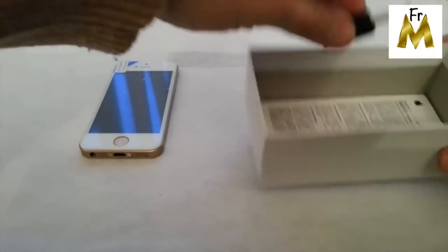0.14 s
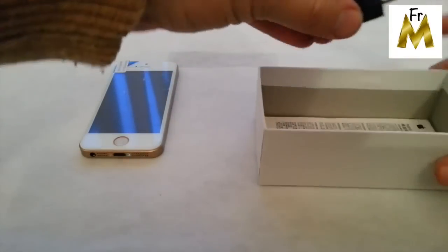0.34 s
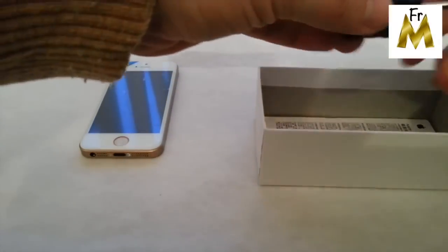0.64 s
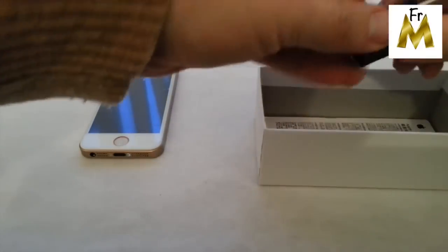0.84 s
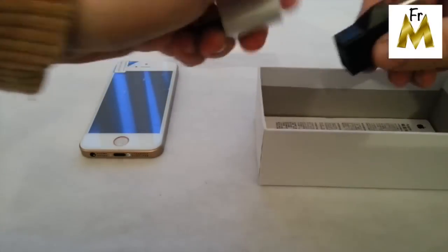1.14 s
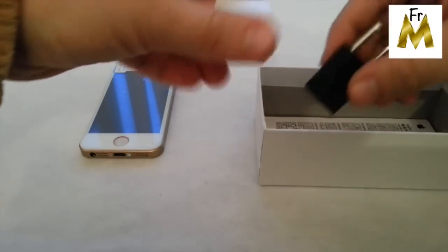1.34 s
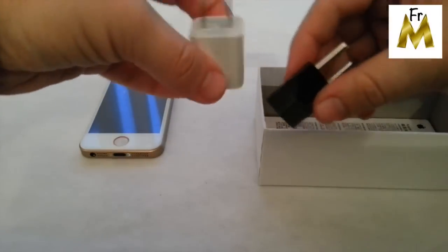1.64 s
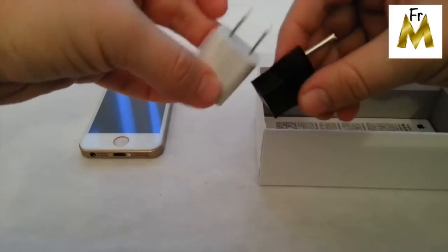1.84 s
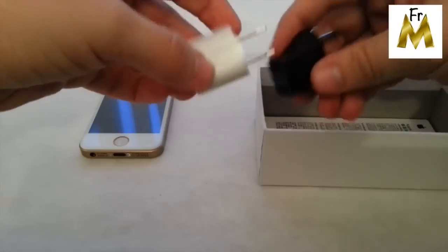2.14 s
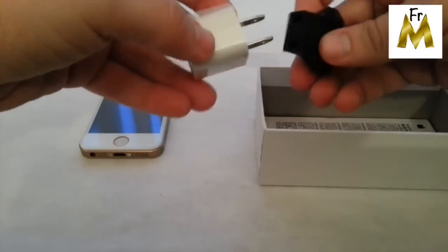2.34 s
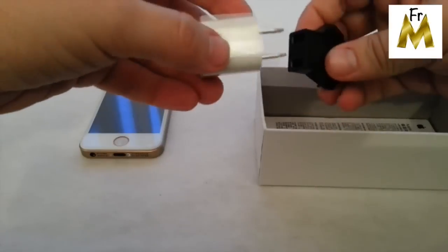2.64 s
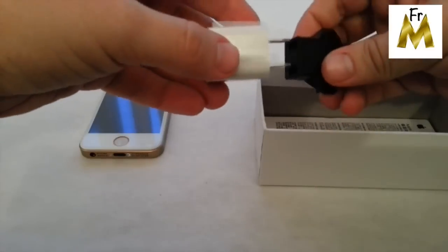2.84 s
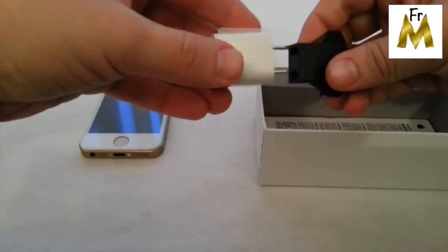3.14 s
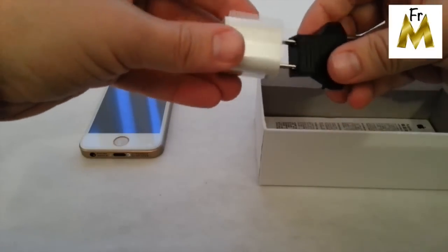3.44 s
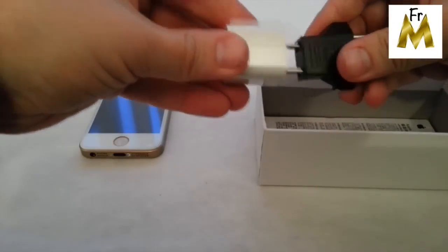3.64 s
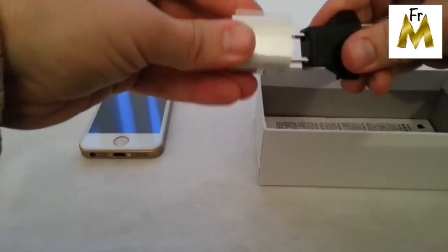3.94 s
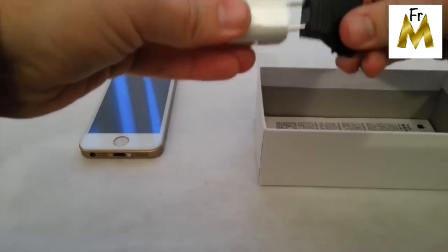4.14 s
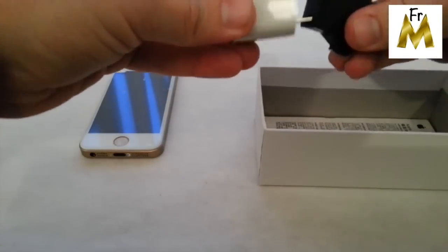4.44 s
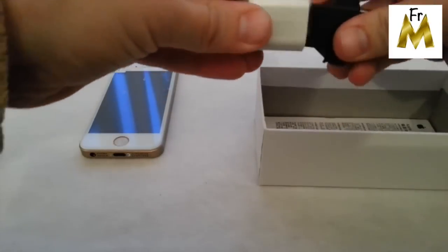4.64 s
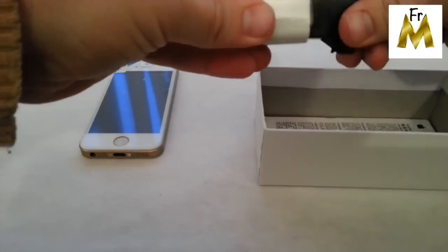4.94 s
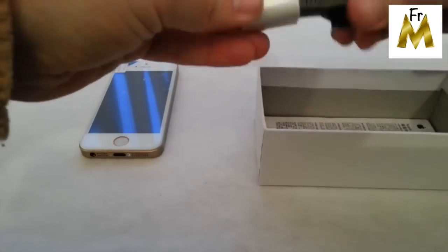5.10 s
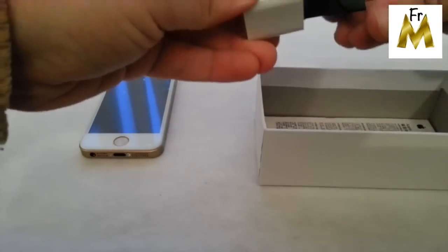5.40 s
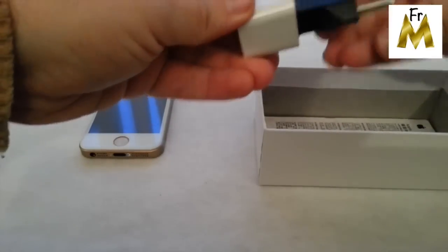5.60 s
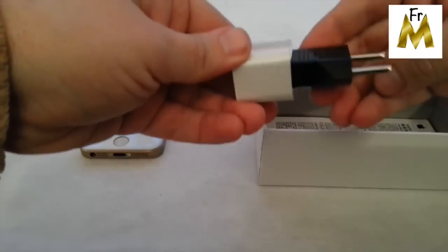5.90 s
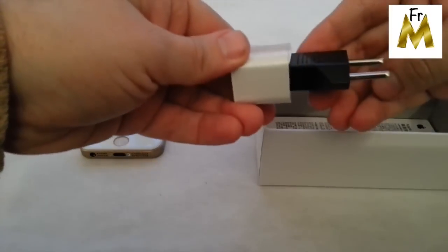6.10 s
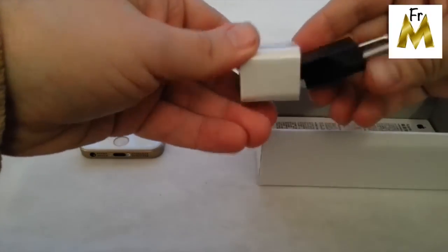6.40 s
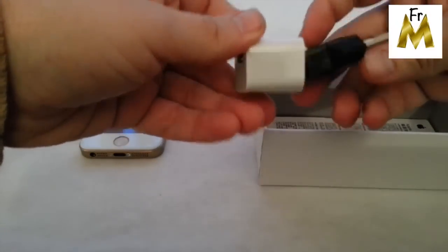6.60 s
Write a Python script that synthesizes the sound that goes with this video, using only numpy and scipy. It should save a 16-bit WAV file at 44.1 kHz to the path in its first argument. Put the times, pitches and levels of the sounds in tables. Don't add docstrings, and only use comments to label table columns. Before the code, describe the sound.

Quiet indoor tabletop handling in close stereo. A soft cardboard thud comes early, followed by one bright metallic click, scattered plastic ticks and hollow knocks as two small parts are fitted together with a firm push. Then it is almost silent until a final little cluster of clicks. Behind it, a muffled vehicle drones past, and noise suppression makes the background pump.

```python
import sys
import numpy as np
from scipy import signal
from scipy.fft import rfft, irfft
from scipy.io import wavfile

SR = 44100
rng = np.random.default_rng(int(sys.argv[2]) if len(sys.argv) > 2 else 0)


def wrap_up_sound(samples):
    columns = np.atleast_2d(samples).T
    tamed = np.clip(columns, -1, 1)
    steps = np.round(tamed * 32767).astype(np.int16)
    wavfile.write(sys.argv[1], SR, steps)


def volts(x):
    e = np.asarray(x, float) / 20
    return 10 ** e


N = 298116


def rms_one(x):
    return x / np.sqrt(np.mean(x ** 2) + 1e-20)


def peak_one(x):
    return x / np.abs(x).max(-1, keepdims=True)


def add(out, sound, start_s):
    i = round(start_s * SR)
    out[..., i:i + sound.shape[-1]] += sound[..., :N - i]


def in_time(rows):
    s, *columns = np.transpose(rows)
    return [np.interp(np.arange(N) / SR, s, column) for column in columns]


def at_hz(points, hz):
    point_hz, point_db = np.transpose(points)
    return np.interp(np.log(hz), np.log(point_hz), point_db)


def humps(rows, width_s):
    t = np.arange(0, N, 32) / SR
    total_db = sum(db * np.clip(1 - abs(t - s) / width_s / 2, 0, 1) for s, db in rows)
    return np.interp(np.arange(N) / SR, t, total_db)


def drift(rate_hz):
    r = np.exp(-80 * np.pi * rate_hz / SR)
    slow = signal.lfilter([1], [1, -2 * r, r * r], rng.standard_normal(N // 40 + 2002))[2000:]
    return np.interp(np.arange(N) / 40, np.arange(len(slow)), rms_one(slow))


def ring(clicks, hz, t60_s):
    r, w = volts(-60 / (t60_s * SR)), 2 * np.pi * hz / SR
    return signal.lfilter([0, np.sin(w)], [1, -2 * r * np.cos(w), r * r], clicks + 1e-18)


# start in seconds, hold in seconds, lift in dB.
OPENINGS = [(0, 0.3, 13), (0.404, 0.1, 10), (0.677, 0.02, 7), (0.853, 0.037, 9), (1.143, 0.26, 12.5),
            (1.398, 0.14, 7.5), (1.657, 0.44, 11.5), (2.17, 0.46, 12), (2.75, .12, 13.5),
            (3.022, 0.31, 13.5), (3.265, 0.74, 16.5), (4.024, 0.11, 12), (4.23, 0.2, 12.5),
            (4.551, 0.02, 12), (4.625, 0.091, 12.5), (4.88, 0.018, 11), (4.732, 0.068, 5.5), (5.12, .16, 4),
            (5.317, 0.317, -1.5), (5.7, 0.16, -5), (5.938, 0.13, 8), (6.193, 0.032, 5), (6.425, 0.04, 12.5),
            (6.5, .07, 8.5), (6.566, 0.17, 9.5), (0.922, 0.089, 3.5), (1.56, 0.07, 2.5), (2.66, .06, 4),
            (2.93, .06, 2.5), (4.15, 0.056, 6), (.55, .08, 3), (4.45, 0.056, 3), (4.983, 0.055, 3),
            (6.288, 0.092, 3.5)]


def suppressor():
    open_db_per_s, close_db_per_s, usual_lift_db = 352, 160, 12
    t = np.arange(0, N, 32) / SR
    s, hold_s, lift_db = np.transpose(OPENINGS)[..., None]
    before_s = np.clip(s - t, 0, None)
    after_s = np.clip(t - s - hold_s, 0, None)
    loss_db = open_db_per_s * before_s + close_db_per_s * after_s
    highest_db = np.clip(lift_db - loss_db, 0, None).max(0)
    return np.interp(np.arange(N) / SR, t, highest_db - usual_lift_db)


# time in seconds, firing rate in Hz, level in dB.
ENGINE = [(0.0, 47.5, -43.5), (0.27, 55, -51), (0.9, 57.25, -56.5), (1.09, 40.2, -56.5), (1.35, 43.3, -53),
          (1.62, 43.2, -52), (1.82, 42.5, -50), (2.07, 47.3, -50), (2.28, 52.3, -45), (2.61, 59, -53),
          (2.79, 62.6, -48), (3.03, 67.5, -45.5), (3.41, 76.3, -43), (3.65, 78, -43), (4.01, 74.1, -52.5),
          (4.22, 56.9, -54.5), (4.86, 58.7, -65.5), (6.76, 61, -64)]
# frequency in Hz, gain in dB.
BOOM = [(40, -8), (75, -14.5), (105, -3.5), (125, -2), (150, 9.5), (172, 3.5), (190, -14), (210, -10),
        (228, -8.5), (250, -17), (450, -41.5)]
# time in seconds, depth in dB.
NULLS = [(.08, 15), (.23, 7.5), (.44, 1), (1.28, -5), (1.76, 0), (1.86, 10.5), (1.96, 6.5), (2.12, 3.5),
         (2.25, 2.5), (2.52, -2.5), (2.841, 7.5), (3.108, 12), (3.33, 11), (3.65, 5), (3.92, 5),
         (4.37, 14.5), (1.55, 5), (2.4, 4), (2.7, 6), (2.97, 6), (4.08, 8), (1.2, 3)]


def engine(lift_db):
    rough, wander_rad = 0.09, 0.25
    even_orders_db, first_order_db = 3.5, 4.5
    null_s, lift_share = 0.03, 1.5
    port_phase_rad = 0.11 * np.array([[1], [-1]])
    hz, level_db = in_time(ENGINE)
    level_db = level_db + lift_share * lift_db - humps(NULLS, null_s)
    turn_rad = 2 * np.pi * np.cumsum(hz) / SR
    weights = []
    for k in range(1, 7):
        order_db = at_hz(BOOM, k * hz) + even_orders_db * (k % 2 == 0) + first_order_db * (k == 1)
        weights.append(volts(order_db))
    weights = np.array(weights)
    weights = weights / np.sqrt(np.sum(weights[1:4] ** 2, 0) / 2)
    orders = np.zeros((2, N))
    for k, weight in enumerate(weights, 1):
        phase_rad = k * turn_rad + wander_rad * drift(2) + port_phase_rad
        orders += weight * (1 + rough * drift(8.2)) * np.sin(phase_rad)
    return volts(level_db) * orders * volts([[-.3], [.3]])


# frequency in Hz, likeness from 0 to 1.
LIKENESS = [(60, 0.84), (180, 0.98), (330, .7), (540, 0.18), (1640, 0.052), (4940, 0.025), (14900, 0.023)]


def coloured(white, spectrum, low_hz, high_hz):
    hz = np.fft.rfftfreq(N, 1 / SR) + 0.0012
    inside = (hz > spectrum[0][0]) & (hz < spectrum[-1][0])
    mid, side = rfft(white) * volts(at_hz(spectrum, hz)) * inside
    alike = at_hz(LIKENESS, hz)
    pair = np.sqrt(1 + alike) * mid + np.sqrt(1 - alike) * side * [[1], [-1]]
    in_band = irfft(pair.mean(0) * (hz > low_hz) * (hz < high_hz), N)
    return irfft(pair, N) / np.std(in_band)


# frequency in Hz, density in dB per Hz.
RUMBLE = [(6, -13.5), (15, -13.5), (36, -28), (48, -2), (58, -1), (72, -9), (90, -13.5), (130, -39)]
# frequency in Hz, density in dB per Hz.
TRAFFIC = [(95, -10), (115, -9.5), (150, -7), (195, -13.5), (230, -4.5), (255, -13.5), (278, -14),
           (310, -22), (400, -20), (630, -28), (1100, -28.5), (1300, -29), (1850, -39.5), (3500, -53.5)]
# frequency in Hz, density in dB per Hz.
HISS = [(880, -27), (1500, -4), (2260, -6), (2490, -7.5), (3430, -10), (3640, -8), (14100, -10),
        (15300, -17)]
# frequency in Hz, density in dB per Hz.
TREMOR = [(20, -24), (32, -20), (39, 0.5), (46, -3), (54, -30.5)]
# time in seconds, lift in dB.
BUMPS = [(.16, 12), (.3, 5), (.49, 9), (.87, -1), (1.35, 5), (2.22, 10.5), (2.36, 10), (2.6, 7), (2.78, 11),
         (2.88, 6.5), (3.3, 11.5), (3.99, 12), (4.23, 12), (4.33, 6.5), (4.41, 12), (4.64, 8.5), (4.72, 8)]
# time in seconds, lift of the tremor in dB.
LEANS = [
    (.05, 10),
    (1.3, 9),
    (1.9, 0),
    (4.0, 5),
    (4.38, 8.5),
    (4.66, 12),
    (4.85, 11),
    (6.0, 6),
    (6.45, 12),
    (6.65, 6),
]


def background(lift_db):
    near_db = in_time(ENGINE)[1]
    white = rng.standard_normal((4, 2, N))
    flicker = volts(1.2 * drift(16.0))
    rumble_db = -65 + 0.76 * np.minimum(lift_db, -1.5) + humps(BUMPS, 0.054)
    rumble_db += 0.19 * (near_db - near_db.mean()) + 1.2 * drift(6.1)
    traffic_db = -67 + 1.05 * lift_db
    hiss_db = -82.5 + 0.61 * np.maximum(lift_db, -10.5)
    tremor_db = -73.5 + humps(LEANS, 0.052)
    rumble = volts(rumble_db) * coloured(white[0], RUMBLE, 30, 90)
    traffic = volts(traffic_db) * coloured(white[1], TRAFFIC, 302.5, 1100)
    hiss = volts(hiss_db) * coloured(white[2], HISS, 10000, 14016)
    tremor = volts(tremor_db) * coloured(white[3], TREMOR, 12, 50)
    return tremor + rumble + flicker * (traffic + hiss)


# start in seconds, length in seconds, level in dB, centre in Hz.
RUSTLES = [(0, 0.055, -61.5, 4000), (0.08, 0.032, -65, 4670), (0.14, 0.024, -70.5, 3500),
           (0.243, 0.046, -65, 4240), (0.309, 0.092, -70.5, 6240), (0.388, 0.095, -65.5, 5500),
           (0.392, 0.062, -63.5, 1250), (3.005, 0.015, -68, 893), (1.121, 0.043, -57.5, 6430),
           (1.316, 0.1, -58, 6720), (1.373, 0.11, -64.5, 6720), (1.774, 0.018, -65.5, 6970),
           (1.903, 0.014, -60, 6430), (1.993, 0.044, -62, 4960), (2.801, 0.012, -58, 4950),
           (3.244, 0.032, -62, 4500), (3.452, 0.038, -62.5, 8030), (3.592, 0.049, -67.5, 7000),
           (3.803, 0.045, -67.5, 4000), (4.287, 0.033, -62, 5010), (4.543, 0.12, -64, 4450),
           (4.626, 0.015, -46.5, 4900), (4.852, 0.075, -61.5, 6740), (4.67, 0.48, -82, 3630),
           (5.102, 0.23, -78, 4400), (6.417, 0.043, -52.5, 4460), (6.497, 0.09, -64.5, 6950),
           (6.539, 0.043, -61, 1500), (6.581, 0.051, -59, 5030), (3.814, .03, -69, 11000),
           (3.425, .02, -68.5, 9000), (1.896, .01, -63, 6000), (6.565, 0.033, -73, 9000),
           (5.125, .03, -71, 9020), (5.15, 0.37, -83.5, 4300), (4.751, .5, -83.5, 1600)]


def rustles():
    slips_per_s, uneven_db, octaves, pan_db = 5000, 2.0, 0.83, -2
    out = np.zeros((2, N))
    draws = rng.random((40, 3, 2, SR // 2))
    for (s, length_s, db, hz), (when, size, sign) in zip(RUSTLES, draws):
        n = max(round(length_s * SR), 64)
        height = volts(-uneven_db * np.log(size + 0.01105))
        slips = ((when < slips_per_s / SR) * height * (sign - .5))[:, :n]
        edges_hz = [hz / 2 ** octaves, min(hz * 2 ** octaves, 15500)]
        rub = signal.sosfilt(signal.butter(2, edges_hz, "band", fs=SR, output="sos"), slips + 1e-18)
        u = np.arange(n) / n
        stroke = np.minimum(1, 3.5 * u) * np.minimum(1, 2.5 * (1 - u))
        add(out, volts(db) * rms_one(rub) * stroke * volts([[pan_db / 2], [-pan_db / 2]]), s)
    return out


# time in seconds, peak in dB.
BOX_DOWN = [
    (0.2509, -37),
    (0.258, -20),
    (0.2866, -38),
    (0.31, -43),
]
# frequency in Hz, level in dB, t60 in seconds.
BOX = [(231, 8, 0.105), (304, 1, 0.077), (401, 8.5, 0.053), (517, 2.5, 0.041), (735, 14.5, 0.0093),
       (810, -19, 0.058), (910, -13, 0.086), (1250, 2.5, 0.013), (1600, -1, 0.016), (1900, 7, 0.015)]


def box():
    blow, panels = np.zeros(N), np.zeros(N)
    for s, db in BOX_DOWN:
        add(blow, volts(db - 44.5) * np.hanning(40), s)
    for k, (hz, db, t60_s) in enumerate(BOX):
        panels += (-1) ** k * volts(db) * ring(blow, hz, t60_s)
    return panels * volts([[1.2], [-1.2]])


# low Hz, high Hz, t60 in seconds, wash in dB,
# wash t60 in seconds.
FACES = [(2000, 5500, 0.002, -22.5, 0.13), (4000, 6700, 0.0042, -22.5, 0.049),
         (5360, 9900, 0.0039, -27, .13), (9200, 16000, 0.00083, -21.5, .075)]
# start in seconds, knock in Hz, ring in Hz,
# crack in ms, wash in dB.
GRIPS = [(0, 3270, 6900, .6, 2), (1.12, 3520, 8400, 0.96, 3.5), (1.155, 3800, 6950, 0.62, 0),
         (1.35, 2600, 6850, .4, -2), (1.77, 2400, 7330, 0.86, -0.5), (1.89, 3200, 7430, 0.67, -14),
         (2, 3660, 6770, 0.77, 3), (2.78, 3590, 6140, 1.04, -1.5), (3.25, 2620, 6050, 1.3, 4.5),
         (3.29, 2500, 6350, 1, 5.5), (3.43, 2360, 6480, 1.2, 5.5), (3.51, 2400, 6500, 0.75, 0),
         (3.57, 3300, 6940, 1.16, 2), (3.7, 2500, 8400, 0.86, -0.5), (3.82, 3100, 6800, 1.3, -6),
         (3.95, 2594, 6900, 0.52, 0), (4.27, 3600, 5900, 0.78, -4), (4.4, 3540, 7780, .8, -4.5),
         (4.47, 3100, 6900, .6, 3.5), (4.62, 4400, 7600, 1, -3), (4.634, 2300, 7600, 0.82, 3),
         (4.642, 2300, 6750, 0.67, 1.5), (4.86, 2600, 6900, 0.76, -4), (6.42, 3300, 7100, 1.15, -4.5),
         (6.451, 3400, 7550, .6, 5), (6.49, 3620, 6980, 1.2, 4.5), (6.59, 3720, 5970, 1.05, -4.5)]
# time in seconds, ring in dB, pin in dB re ring, edge in dB re ring,
# left-right in dB.
METAL = [(1.1647, -29, -5.5, -6.5, -17), (1.3573, -26.5, -16, -24, -17), (1.3628, -24, -17, -15, -12),
         (1.3655, -29, -16, -11, -24), (1.3666, -12.5, -19.5, -11, -14), (1.3684, -20, -19, -7, -7),
         (1.372, -24.5, 1, -10, -6), (1.7957, -33.5, -6, -5.5, -2), (3.273, -32, 5, -21.5, -5.5),
         (3.4523, -42.5, -1, -12, 0), (3.7136, -42.5, 6, 3.5, -4.5), (3.7183, -56, 10.5, -2, -14),
         (4.092, -74, 15, 0, -1), (4.2912, -42, 14.5, -7.5, 2), (4.4175, -24, -0.5, 2, -11.5),
         (4.8809, -39.5, -10, -7.5, -10), (6.435, -46.5, 12.5, -4, 14), (6.6038, -44.5, 10, 2.5, -5.5)]
TURNING = [(.2585, -65, 6, -6, 2), (1.1354, -43, 2, 0, 6), (1.1414, -38, -13, -13, -8),
           (1.9026, -47, -8, 4, -19), (1.906, -28, -5, -7, -20), (2.0119, -41, -5.5, -8.5, -9.5),
           (6.4386, -42.5, 12.5, -13, 9), (6.4388, -41.5, 3.5, -25, -22.5), (6.4428, -44, 2.5, -10, -21.5),
           (6.4558, -45, -13, -2, -7), (6.503, -43.5, -1.5, -2, -8.5), (6.561, -65, 13, -1, 7),
           (6.6083, -51, 8, -6, -4.5)]
FITTING = [(2.7962, -34, -4, -24, -15), (3.303, -27.5, -12, -8.5, -5.5), (3.4477, -31, -22, -10.5, -17),
           (3.461, -44, 0, -15, 1), (3.5265, -60.5, 3, -11, -5), (3.5854, -33, -5.5, -4.5, -3.5),
           (3.594, -45, -8, -4, -11), (3.7089, -51, 11.5, -6, -5), (3.8313, -41, 3.5, -8.5, -6),
           (3.9728, -61.5, 6, -8, 2), (4.4200, -28, -3, -0.5, -7), (4.488, -63.5, 12.5, -8, -5.5),
           (4.6356, -32.5, 4, -19, 1), (4.6457, -31, -12, -3, -9.5), (5.1335, -62, -2.5, 4.5, -11.5)]
MORE_TAPS = [(1.3601, -33, -12, -13, -14), (1.3675, -15.5, -19, -14, -15.5), (1.785, -54, -1, 2, -1),
             (3.2617, -50.5, 0.5, -14.5, -6), (4.423, -34.5, 0, -3.5, -5.5), (4.631, -48, 10, -10, -5),
             (4.6388, -40, 7.5, -10, -3), (6.437, -45.5, 9, -13, -6), (6.4418, -43, 7, -8, -6),
             (6.448, -51, 12, -8, -1), (3.4495, -42.5, -2.5, -4, -6), (1.3634, -21, -14, -15, -13),
             (1.3757, -33, -8, -8, -10), (1.3785, -35, -8, -8, -10), (.428, -64, 3, -8, 0),
             (6.452, -56, 10, -10, -4), (4.4275, -46, 3, -3, -5)]


def ticks():
    alike, ringing = 0.67, 6.0
    scuff_s, scuff_db = 0.003006, -7
    pin_hz, edge_hz = 4680, 9500
    metal_knock_db, plastic_knock_db = -8.5, 1.83
    pan_shares = np.array([0.56, 1, 1, 1])
    out, lead = np.zeros((2, N)), SR // 50
    t = (np.arange(SR // 7) - lead) / SR
    after_s = np.clip(t, 0, None)
    bands = [signal.butter(2, face[:2], "band", fs=SR, output="sos") for face in FACES]
    noises = rng.standard_normal((64, 2, 2, len(t)))
    noises[:, 1] **= 3
    contacts = METAL + TURNING + FITTING + MORE_TAPS
    for k, (contact, ((a, b), grit)) in enumerate(zip(contacts, noises)):
        s, db, pin_db, edge_db, pan_db = contact
        _, knock_hz, ring_hz, crack_ms, loose_db = [grip for grip in GRIPS if grip[0] <= s][-1]
        knock_db = pin_db + (metal_knock_db if k < len(METAL) else plastic_knock_db)
        crack = np.array([alike * a + np.sqrt(1 - alike ** 2) * b, a])
        crack = crack * np.exp(-after_s / crack_ms * 1000) * (t >= 0)
        levels_db = knock_db, pin_db, 0, edge_db
        modes_hz = knock_hz, pin_hz, ring_hz, edge_hz
        pans_db = pan_db * pan_shares
        for band, face, face_db, hz, pan in zip(bands, FACES, levels_db, modes_hz, pans_db):
            _, _, t60_s, wash_db, wash_t60_s = face
            struck = peak_one(crack) + ringing * peak_one(ring(crack, hz, t60_s))
            direct = peak_one(signal.sosfilt(band, struck)) * volts([[pan / 2], [-pan / 2]])
            wash = rms_one(signal.sosfilt(band, grit + .035 * ring(grit, hz, 4 * t60_s)))
            scuff_rise = volts(scuff_db) * np.exp(t / scuff_s)
            wash = wash * np.where(t < 0, scuff_rise, volts(-60 * after_s / wash_t60_s))
            wash = volts(wash_db + loose_db + 0.28 * abs(pan)) * wash
            add(out, volts(db + face_db + 1) * (direct + wash), s - lead / SR)
    return out


# time in seconds, peak in dB, ring in Hz, dry knock re ring (ratio).
THUDS = [(1.1658, -51, 1880, 2.6), (1.3694, -48, 2020, 1.3), (1.795, -49.5, 2155, 3.5),
         (1.9058, -42, 1900, 3.3), (1.9067, -40.5, 887, 2.5), (2.7943, -39.5, 1854, 0.2),
         (2.7978, -41.5, 1453, .3), (3.2512, -51, 1890, 0.66), (3.2588, -45.5, 1330, 1.2),
         (3.271, -35, 1463, 0.46), (3.3013, -49, 1550, 1.3), (3.448, -38.5, 1504, 0.42),
         (3.524, -58, 1949, .6), (3.583, -49.5, 1870, 1.7), (3.7082, -42.5, 1524, 1.4),
         (3.8303, -54, 2040, 1.7), (4.0912, -57, 1175, 2.3), (4.2902, -49, 1400, 1.9),
         (4.4169, -43, 1324, 1.6), (4.4258, -42, 1584, 0.2), (4.487, -56, 1610, 0.22),
         (4.551, -55, 1630, 0.19), (4.5623, -58, 1610, .2), (4.6347, -31, 1334, 0.042),
         (4.6352, -40, 2000, 0.32), (6.434, -45, 1900, 0.99), (6.4393, -41, 1403, 0.68),
         (6.504, -52.5, 1900, 2.9), (6.5963, -48.5, 1670, 2.6), (6.6016, -42.5, 1520, 2.7),
         (4.261, -57, 995, 2.1), (4.305, -55.5, 1900, .6), (4.6385, -38, 1250, .1), (.428, -60, 1400, 1.5),
         (3.009, -60, 900, 2), (4.6455, -44, 2180, 0.4), (3.2797, -43.5, 1500, 0.72),
         (3.285, -52, 1330, .5)]


def thuds():
    rattle_s, t60_s = 0.0012, 0.013
    out, t = np.zeros((2, N)), np.arange(SR // 8) / SR
    rattles = rng.standard_normal((40, 3, len(t))) * t * np.exp(-t / rattle_s)
    knock_band = signal.butter(2, [550, 2800], "band", fs=SR, output="sos")
    for (s, db, hz, dry_ratio), (common, *own) in zip(THUDS, rattles):
        rattle = common + 0.27 * np.array(own)
        shell = ring(np.diff(rattle, prepend=0), hz, 0.008)
        shell = ring(shell, hz, t60_s)
        knock = peak_one(signal.sosfilt(knock_band, rattle))
        add(out, volts(db + 3.5) * peak_one(peak_one(shell) + dry_ratio * knock), s)
    return out


# frequency in Hz, level in dB, t60 in seconds.
SOCKET = [(1250, -10.5, .03), (1624, -3, 0.039), (3050, -8, .02), (4400, -17, 0.01)]


def slide():
    push_s, push_hold_s, push_db, push_fade_db_per_s = 4.652, 0.015, -60, 190
    creep_db, creep_end_s = -80, 5.4
    slips = volts(3.0 * np.minimum(rng.exponential(1, N), 4))
    slips = slips * (rng.random(N) < 400 / SR) * rng.choice([-1, 1], N)
    t = np.arange(N) / SR - push_s
    push = volts(push_db - push_fade_db_per_s * np.clip(t - push_hold_s, 0, None))
    creep = volts(creep_db) * np.clip((creep_end_s - push_s - t) / 0.1 + 1, 0, 1)
    onset = np.clip(t / 0.02 + 1, 0, 1)
    murmur = sum(volts(db) * ring(slips, hz, t60_s) for hz, db, t60_s in SOCKET)
    return (push + creep) * onset * rms_one(murmur)


def room(x):
    t60_s, level_db, wall_cut_hz = 0.1, -26.5, 2700
    t = np.arange(SR // 3) / SR
    echo = rng.standard_normal((2, len(t))) * volts(-60 * t / t60_s) * (t > .002)
    echo = signal.sosfilt(signal.butter(1, wall_cut_hz, fs=SR, output="sos"), echo)
    echo = echo / np.linalg.norm(echo[0])
    return volts(level_db) * signal.fftconvolve(x, echo, axes=1)[:, :N] * 4


def scene():
    shell_room_db, port_lag_s = -4.5, 0.00012
    shells, on_table = thuds(), box() + slide()
    echoes = room(volts(shell_room_db) * shells + on_table)
    hands = ticks() + rustles() + shells + on_table + echoes
    hands[0] = np.roll(hands[0], round(port_lag_s * SR))
    lift_db = suppressor()
    return hands + engine(lift_db) + background(lift_db)


def roll_off(x):
    return signal.sosfilt(signal.butter(12, 15490, fs=SR, output="sos"), x)


def record(dry):
    edge = signal.ellip(7, .5, 27, 14600, fs=SR, output="sos")
    mix = signal.sosfilt(edge, dry)
    return roll_off(mix)


dry = scene()
out = record(dry)
wrap_up_sound(out)
```